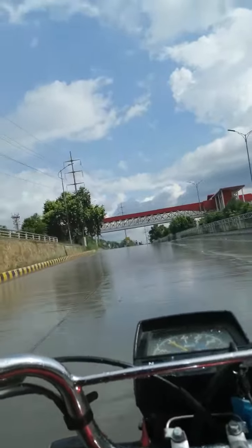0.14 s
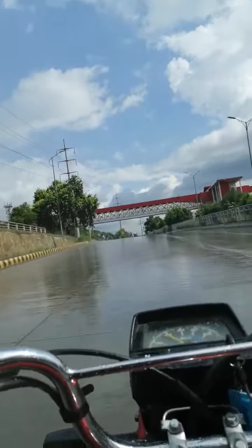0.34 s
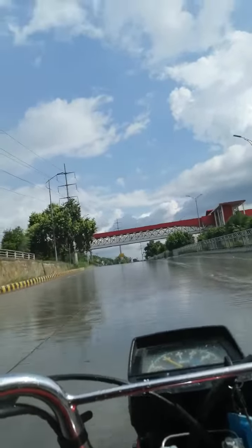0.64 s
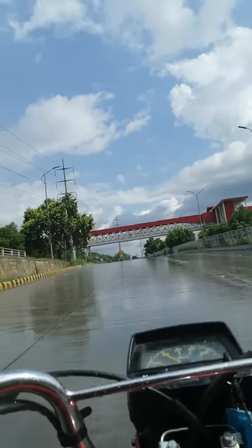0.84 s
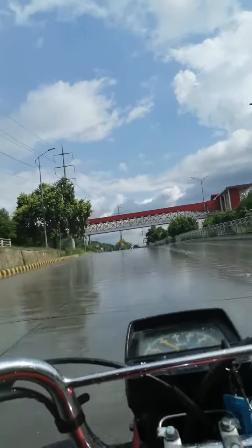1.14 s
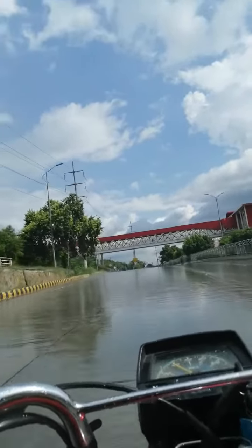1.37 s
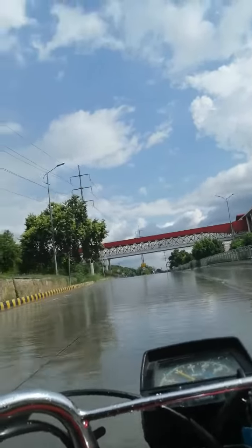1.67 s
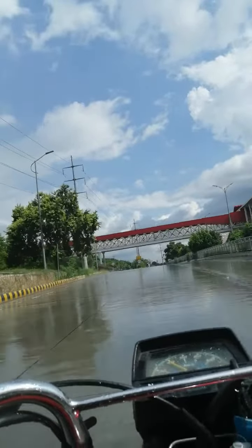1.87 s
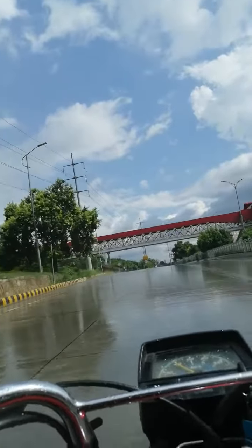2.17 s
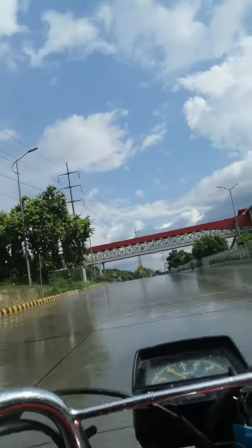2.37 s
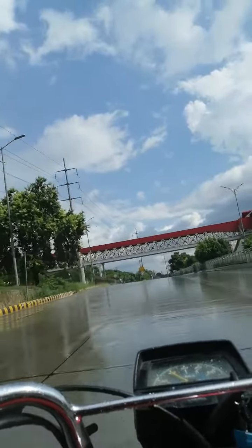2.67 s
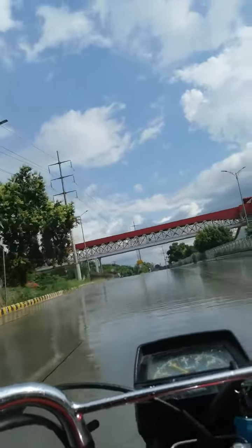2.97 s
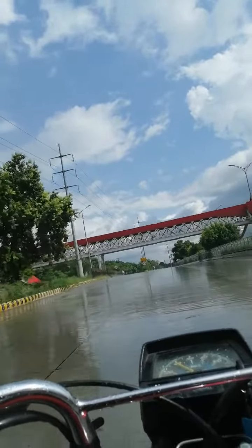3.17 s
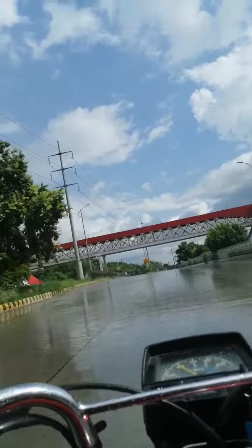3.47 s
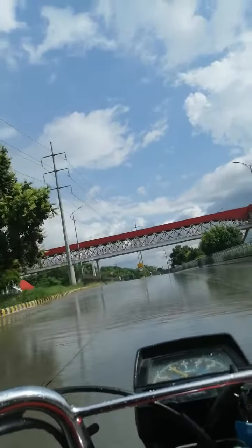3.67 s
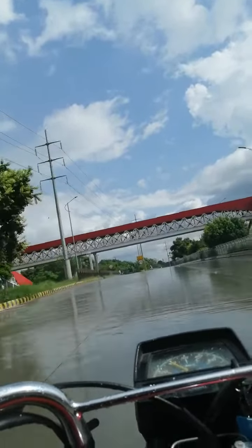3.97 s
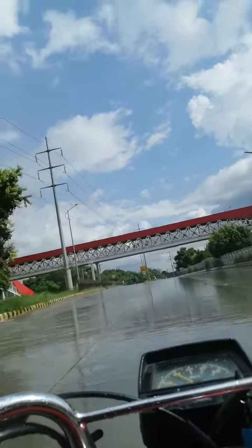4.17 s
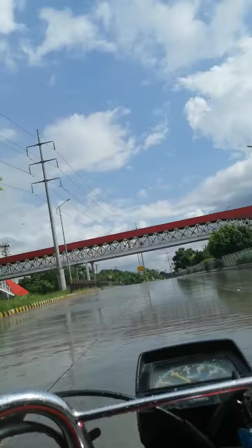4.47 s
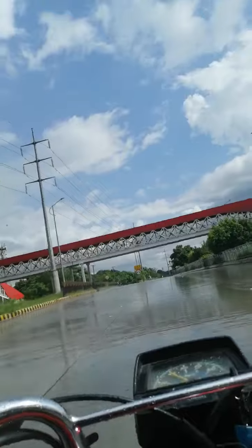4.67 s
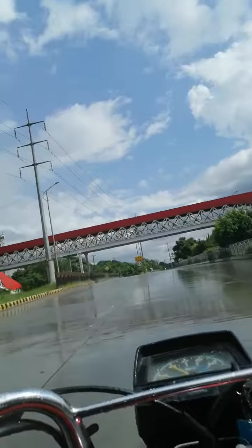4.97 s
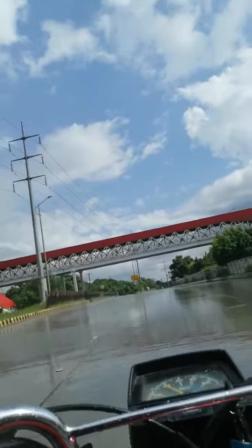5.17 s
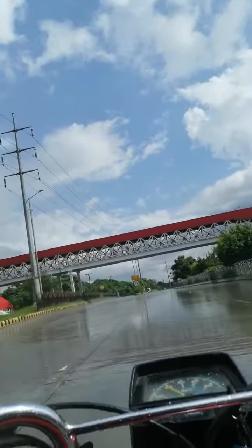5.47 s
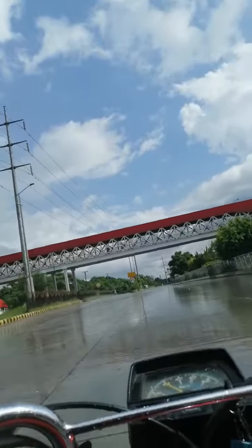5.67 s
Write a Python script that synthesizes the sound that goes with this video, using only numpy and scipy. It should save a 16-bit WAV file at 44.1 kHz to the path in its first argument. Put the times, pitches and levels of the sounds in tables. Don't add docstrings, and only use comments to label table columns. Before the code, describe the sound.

Steady motorbike engine throb with ticking valves over wet tyre hiss, repeatedly buffeted by low, ragged bursts of wind on a phone.

```python
import sys
import numpy as np
from scipy import signal
from scipy.fft import rfft, irfft, next_fast_len
from scipy.io import wavfile
from scipy.ndimage import uniform_filter1d, map_coordinates

SR = 44100
rng = np.random.default_rng(int(sys.argv[2]) if len(sys.argv) > 2 else 0)


def volts(x):
    e = np.asarray(x, float) / 20
    return 10 ** e


def digitize_waveform(pressure):
    field = np.atleast_2d(pressure).T
    bounded = np.clip(field, -1, 1)
    quanta = np.round(bounded * 32767).astype(np.int16)
    wavfile.write(sys.argv[1], SR, quanta)


N = 256662

# t/s, firing rate/Hz
FIRING_RATE = [(0, 31.106), (.582, 31.217), (1.164, 31.304), (1.746, 31.386), (2.328, 31.385),
               (2.91, 31.344), (3.492, 31.458), (4.074, 31.628), (4.656, 31.708), (5.238, 31.997),
               (5.82, 32.229)]
# multiple of the firing rate, level over the hiss/dB
EXHAUST_ORDERS = [(1, -5), (2, 10), (3, -4), (4, 2), (5, 7), (6, -1), (7, -5.5), (8, -6), (9, 1), (10, -2),
                  (11, 1), (12, 5.5), (13, 0), (14, 0), (15, 1), (16, -3.5), (17, -14), (18, -12),
                  (19, -11), (20, -17)]
# multiple of the firing rate, level/dB
SIDE_ORDERS = [(25, -16), (26, -18), (27, -17), (33, -20), (35, -20), (30, -19), (32, -23), (34, -15)]
# share of cycle after firing, level/dB, t60/s
VALVES = [
    (.67, 1, .028),
    (.86, -6, .04),
    (.2, -7, .04),
]
# f/Hz, width/Hz, level/dB
CASING = [(1670, 240, -5.5), (1950, 34, -4.5), (2098, 55, -5.5), (3006, 47, 2.5), (3245, 110, 0),
          (6080, 650, -10)]
# t/s, hiss level/dB
MACHINE_LEVEL = [(0, -48), (1, -46.5), (2, -46.5), (3, -47), (4, -47), (5, -47.5), (5.82, -48)]
# f/Hz, density level/dB
HISS = [(290, -30), (560, -7.5), (900, -1), (1150, -9), (1400, -17), (1700, -7.5), (2250, -12.5),
        (3100, -11), (3500, -19.5), (4300, -20.5), (5200, -8), (6100, -10.5), (6900, -22), (7300, -21.5)]
# t/s, strength level/dB
AIRFLOW = [(0, -39), (.21, -33.5), (.3, -37), (.41, -39.5), (.52, -35.5), (.63, -34.5), (1.03, -35),
           (1.08, -45), (1.2, -39), (1.78, -40.5), (2.03, -35), (2.85, -34.5), (3.1, -27), (3.66, -34),
           (4.1, -29.5), (4.45, -39.5), (4.62, -29), (5.82, -35)]
# t/s, strength level/dB, deep over flutter/dB, half-length/s
GUSTS = [(0, -25, 3, 0.032), (0.1, -30, -3, 0.037), (0.326, -31, -2, 0.026), (0.488, -33, -4, 0.027),
         (0.559, -29.5, 1, 0.0302), (1.26, -27, 6, 0.025), (1.29, -38, -8, 0.034), (1.407, -28, 6.5, 0.043),
         (1.498, -26, 3.5, 0.028), (1.599, -31, 2, 0.066), (1.716, -28, -2, 0.027),
         (2.224, -36.5, -13.5, 0.067), (2.599, -34.5, -5, 0.052), (3.133, -29.5, 7.5, 0.066),
         (3.29, -25, 5, 0.049), (3.413, -29.5, -3, 0.065), (3.572, -25, 4, 0.08), (3.782, -35, 15, 0.06),
         (3.86, -29, 4.5, 0.046), (4.126, -27.5, 14.5, 0.023), (4.243, -24, 7.5, 0.089),
         (4.419, -25.5, -15.5, 0.011), (4.65, -35, -5, 0.034), (5.127, -26.5, 10.5, 0.013),
         (5.219, -26, 3.5, 0.049), (5.365, -35.5, 14.5, 0.023), (5.428, -28, -16, 0.014),
         (5.54, -22.5, 1, 0.024), (5.656, -25, 3.5, 0.068), (5.804, -27.5, -2.5, 0.046)]
# f/Hz, density level/dB
DEEP = [(12, -18), (25, 0), (70, 1.5), (130, -10), (250, -31), (500, -54)]
# f/Hz, density level/dB
FLUTTER = [(50, -25.5), (110, 3), (180, -1), (330, -4), (600, -15.5), (1100, -39.5), (1600, -70.5)]
# f/Hz, density level/dB
SLAP = [(200, -7.5), (450, 0), (650, -1), (1000, -11), (1400, -33.5), (1900, -42), (3000, -86.5)]
# f/Hz, density level/dB
EDGE = [(300, -38.5), (700, 0), (1000, 5), (1400, -3), (1800, -22), (2800, -66)]
# strongest t/s, peak level/dB, f/Hz, pulses
EDDIES = [(.0085, -19, 340, 2), (.1169, -12.5, 280, 1), (.1502, -15, 430, 1), (.1567, -15, 500, 1),
          (.1728, -14.5, 230, 2), (.2093, -15, 580, 1), (.3278, -14.5, 240, 1), (.572, -23.5, 300, 1),
          (1.233, -18, 90, 1), (1.299, -19, 240, 1), (1.5092, -18.5, 400, 3), (1.5823, -18.5, 270, 1),
          (2.1996, -18, 240, 1), (2.4881, -20, 200, 1), (2.5503, -15.5, 340, 1), (2.98, -14, 430, 2),
          (3.2875, -15.5, 260, 1), (3.2925, -17, 300, 1), (3.2965, -16, 260, 1), (3.8452, -15, 270, 2),
          (3.8867, -18, 370, 2), (4.136, -17, 200, 2), (4.1827, -15.5, 200, 1), (4.2434, -17.5, 560, 1),
          (4.2651, -15, 280, 3), (4.2926, -16.5, 670, 1), (4.3184, -15, 240, 1), (4.4218, -16, 430, 2),
          (4.6062, -14, 580, 1), (5.4334, -17, 270, 4), (5.6577, -15.5, 230, 2), (5.7786, -13, 370, 5),
          (.123, -20, 300, 1), (.1635, -17, 450, 1), (.4595, -27, 740, 3), (1.476, -26, 620, 1),
          (2.548, -19, 380, 1), (3.0435, -23, 650, 1), (3.568, -21, 620, 1), (3.6185, -22, 750, 1),
          (4.2615, -15, 700, 1), (4.41, -21, 800, 1), (5.1135, -26, 650, 1), (5.41, -23, 620, 2),
          (5.5825, -20, 850, 1), (5.607, -26, 620, 1), (5.425, -18, 280, 1), (3.845, -20, 450, 1)]
# t/s, peak level/dB, f/Hz
THUMPS = [(.4931, -20.5, 330), (.558, -21, 150), (1.412, -20, 90), (1.487, -22, 130), (1.592, -22, 110),
          (1.637, -21, 330), (1.724, -21, 120), (3.042, -20, 400), (3.0857, -19, 180), (3.1263, -21, 180),
          (3.149, -19, 200), (3.1756, -20, 130), (3.2183, -18, 200), (3.3988, -20, 150), (3.5013, -20, 130),
          (3.5491, -21, 150), (3.5772, -18.5, 240), (3.6125, -19, 130), (3.741, -21, 150),
          (3.798, -21, 150), (4.2345, -17, 150), (4.6348, -18, 180), (4.8462, -20, 200), (5.1996, -18, 150),
          (5.2477, -16.5, 150), (5.5216, -18, 270), (5.5499, -17.5, 240), (5.6169, -20, 130),
          (5.6292, -19, 240), (5.8129, -17.5, 400), (.1063, -17.5, 300), (.214, -23, 150),
          (1.318, -22, 350), (1.5035, -17, 400), (1.766, -22, 380), (2.596, -21, 350), (3.0976, -19, 300),
          (3.2649, -18, 300), (3.3169, -18, 200), (3.461, -22, 350), (3.495, -21, 140), (3.769, -21, 140),
          (4.1695, -19, 200), (4.1946, -19, 250), (4.2245, -19, 500), (4.272, -15, 170), (4.3255, -18, 450),
          (4.978, -21, 140), (5.082, -21, 140), (5.1162, -19, 160), (5.482, -21, 380), (5.708, -20, 140),
          (5.75, -19, 350), (5.7845, -16, 300)]
PULLS = [.123, 2.488, 2.5475, 3.2925, 3.126, 3.317, 3.577, 3.613, 3.8, 4.243, 4.265, 4.293, 4.318, 4.41,
         4.606, 4.634, 5.116, 5.2, 5.425, 5.433, 5.617, 5.779]
# t/s, peak level/dB, f/Hz, cycles
DROPS = [(.0566, -34, 3000, 2), (.3878, -28, 3500, 1), (.8261, -30, 5400, 2), (.977, -32, 5600, 2),
         (1.0418, -20, 5700, 4), (1.0693, -27, 4600, .8), (1.1495, -28, 3800, 1), (1.171, -26, 3000, 1),
         (1.2017, -33, 2800, 1), (1.3578, -30, 5600, 2), (2.0198, -28, 5100, 2), (2.7441, -32, 3000, 1),
         (4.5537, -33, 3100, 3), (5.4004, -36, 3600, 1), (5.4934, -29, 5200, 1), (.307, -33, 5800, 1),
         (.464, -35, 6200, 1), (.508, -35, 6200, 1), (.795, -33, 5600, 1), (1.404, -35, 3200, 2),
         (2.04, -34, 3050, 2), (2.266, -34, 5300, 2), (2.4247, -34, 3250, 3), (4.378, -36, 4000, .8),
         (5.1136, -32, 5900, 2)]
# t/s, peak level/dB, cracking edge level/dB, length/s
PUFFS = [(0.102, -27, -38, 0.0061), (0.146, -14.5, -39, 0.02), (0.207, -21, -44, 0.0072),
         (0.32, -24, -46, 0.0052), (0.449, -25, -36, 0.0077), (1.5, -24, -43, 0.0083),
         (1.584, -18, -33, 0.0052), (1.256, -27.5, -50, 0.018), (2.977, -30, -47, 0.013),
         (3.035, -23.5, -47, .007), (3.082, -23, -41, 0.02), (3.278, -23, -44, 0.0097),
         (3.57, -21, -35, 0.034), (3.615, -24.5, -36, 0.0046), (4.242, -19, -39, 0.009),
         (4.255, -9.5, -33, 0.0088), (4.287, -16, -31, 0.0055), (4.322, -18, -32, 0.004),
         (4.392, -18, -33, 0.0055), (4.411, -39, -33, 0.0093), (4.6, -19, -23, 0.0054),
         (4.632, -22, -44, 0.0087), (4.722, -20, -39, .008), (5.107, -27.5, -40, .007),
         (5.216, -30, -28.5, 0.014), (5.24, -37, -29, 0.0057), (5.406, -22, -44, 0.021),
         (5.436, -25.5, -32.5, 0.014), (5.579, -22, -32.5, 0.0084), (5.778, -27, -42, 0.0076),
         (0.46, -23.5, -42, .006), (0.551, -29, -44, 0.0048), (1.224, -25.5, -47, .006),
         (1.298, -30, -40, 0.0048), (1.469, -37, -44, 0.0045), (1.635, -26, -43, 0.007),
         (1.954, -27.5, -37, .006), (2.285, -26.5, -44, 0.0071), (2.886, -28, -44, 0.0065),
         (3.095, -30, -29, .006), (3.298, -31, -42, 0.0053), (3.433, -29, -33.5, 0.0048),
         (3.951, -26, -42, 0.0076), (4.194, -23, -40, 0.0086), (4.223, -24, -37, .009),
         (4.841, -23, -45, 0.0073), (5.486, -28, -40, .007), (5.537, -28, -29, .005),
         (5.605, -27, -39, .006), (4.292, -28, -30.5, 0.0074)]


def unit(x):
    return x / np.sqrt(np.mean(x ** 2) + 1e-20)


def along(points, hz):
    f, v = np.transpose(points)
    return np.interp(np.log(hz + 1), np.log(f + 1), v)


def curves(rows):
    s, *cols = np.transpose(rows)
    return [np.interp(np.arange(N) / SR, s, c) for c in cols]


def wobble(rate):
    knots = rng.standard_normal(int(N * rate / SR) + 4)
    return map_coordinates(knots, [np.arange(N) * rate / SR])


def filtered(x, response):
    m = next_fast_len(N + SR // 2)
    return irfft(rfft(x, m) * response(np.fft.rfftfreq(m, 1 / SR)), m)[:N]


def shaped(x, points):
    return filtered(x, lambda hz: volts(along(points, hz)))


def causal(points):
    def response(hz):
        cepstrum = irfft(np.log(volts(along(points, hz)) + 1e-6))
        cepstrum[1:len(hz) - 1] *= 2
        cepstrum[len(hz):] = 0
        return np.exp(rfft(cepstrum, 2 * len(hz) - 2))
    return response


def modes(rows):
    def response(f):
        total = 0
        for k, (centre, width, db) in enumerate(rows):
            damping = 1j * f * width
            total = total + (-1) ** k * volts(db) * damping / (centre ** 2 - f * f + damping)
        return total
    return response


def noise(spectrum):
    return unit(shaped(rng.standard_normal(N), spectrum))


def steady(spectrum, span):
    x = noise(spectrum)
    return x / np.sqrt(np.abs(uniform_filter1d(x * x, int(span * SR))) + 0.046)


def later(pulses, share, rate):
    return np.roll(pulses, round(share * SR / rate.mean()))


def engine():
    rate = curves(FIRING_RATE)[0]
    cycle = np.cumsum(rate) / SR + .849
    combustion = cycle + .002 * wobble(20)
    fired = np.flatnonzero(np.diff(np.floor(combustion)) > 0)
    pulses = np.zeros(N)
    pulses[fired] = volts(1.5 * rng.standard_normal(len(fired)))
    exhaust = thrum(combustion) + bark(pulses, rate) + roar()
    return exhaust + gears(cycle, rate) + piston(pulses, rate) + panel(pulses) + valves(cycle, rate)


def thrum(combustion):
    dips = np.array([.31, .72])
    out = np.zeros(N)
    for k, db in EXHAUST_ORDERS[:10]:
        lag = np.angle(-np.exp(-2j * np.pi * k * dips) @ [.75, 1])
        out += volts(db + 3 + 1.2 * wobble(6)) * np.cos(2 * np.pi * k * combustion + lag)
    return out


def bark(pulses, rate):
    orders = [(k * 31.4, db) for k, db in EXHAUST_ORDERS[10:]]
    pipe = [(315, -60)] + orders + [(700, -26), (1000, -28), (1400, -45), (3000, -80)]
    echoed = pulses + volts(-10) * later(pulses, .28, rate)
    return volts(8.6) * unit(shaped(echoed, pipe))


def roar():
    return volts(-3.3) * noise([(150, -31.5), (260, -6.5), (480, 2), (560, -18.5), (900, -15.5), (1200, -34.5)])


def gears(cycle, rate):
    fade_29 = np.interp(rate, [31.4, 31.7], [1, .35])
    rise_28 = np.interp(rate, [31.7, 31.9], [.14, .55])
    out = np.sin(2 * np.pi * 29 * cycle) * volts(1.5 * wobble(8) - 4.5) * fade_29
    out += np.sin(2 * np.pi * 28 * cycle) * rise_28
    for k, db in SIDE_ORDERS:
        out += volts(db + 2 * wobble(5)) * np.sin(2 * np.pi * k * cycle + k)
    return out


def piston(pulses, rate):
    strokes = sum(later(pulses, share, rate) for share in (.12, .62))
    bore = modes([(870, 240, 0)])
    return volts(-11.5) * unit(filtered(strokes, lambda f: bore(f) ** 2))


def panel(pulses):
    shaking = pulses + 0.023 * rng.standard_normal(N)
    return volts(-13.0) * unit(filtered(shaking, modes([(901.0, 15.0, 0)])))


def valves(cycle, rate):
    knocks = np.zeros(N)
    for share, db, t60 in VALVES:
        since_knock = ((cycle - share) % 1) / rate
        knocks += volts(db - 60 * since_knock / t60)
    rough = knocks * volts(1.2 * wobble(40)) * rng.standard_normal(N)
    return volts(-5.5) * unit(filtered(rough, modes(CASING)))


def spray():
    z = signal.stft(rng.standard_normal(N), nperseg=512)[2]
    patches = uniform_filter1d(rng.standard_normal(z.shape), 6, 0)
    patches = unit(uniform_filter1d(patches, 10, 1))
    sheet = unit(signal.istft(z * volts(0.87 * patches), nperseg=512)[1][:N])
    droplets = (rng.random(N) < 90 / SR) * rng.uniform(-1.32, 1, N)
    crackle = shaped(droplets, [(1500, -31.5), (3500, 4.5), (8000, 4.0)])
    return unit(filtered(sheet + 9 * crackle, causal(HISS)))


def airflow():
    t = np.arange(0, N / SR + .002, .001)
    gusts = 0
    for s, db, deep_db, half in GUSTS:
        powers = volts([[2 * db + deep_db], [2 * db - deep_db]])
        gusts = gusts + powers * np.exp(-2 * ((t - s) / half) ** 2)
    return np.sqrt(volts(2 * curves(AIRFLOW)[0]) + curves(np.vstack([t, gusts]).T))


def wind():
    large, small = airflow()
    lump = wobble(35)
    deep_lumps = volts(0.98 * lump)
    deep = large * volts(-4.5) * unit(deep_lumps * steady(DEEP, span=0.087))
    flutter_lumps = volts(1.6 * lump + 2.16 * wobble(120))
    flutter = small * volts(-3.5) * unit(flutter_lumps * steady(FLUTTER, span=0.047))
    rasp_lumps = volts(3.2 * lump + 2.2 * wobble(120))
    rasp_strength = np.hypot(small * volts(-11.5), wakes())
    rasp = rasp_strength * volts(-4) * unit(rasp_lumps * steady(SLAP, span=0.022))
    return deep + flutter + rasp + eddies(small) + puffs()


def eddies(flow):
    rows = []
    for s, db, hz, pulses in EDDIES:
        for k in range(pulses):
            place = (k + 1) // 2 * (-1) ** k
            duller = 0.66 if k else 1
            rows.append((s + 0.00718 * place, volts(db - 5.5 * np.sqrt(k)), hz * duller))
    rows += [(s, volts(db), hz) for s, db, hz in THUMPS]
    sides = [-1 if np.abs(s - np.array(PULLS)).min() < .0015 else 1 for s, *_ in rows]

    when, size, pitch = rng.random((3, round(20 * N / SR)))
    stray_gain = flow[(when * N).astype(int)] * volts(2 + 14 * (size - .5))
    stray_hz = 192 * 2 ** (1.3 * (pitch - .5))
    rows += zip(when * N / SR, stray_gain, stray_hz)
    sides += list(rng.choice([-1, 1], len(when)))

    out, t = np.zeros(N + SR), np.arange(-SR // 50, SR // 50) / SR
    for (s, gain, hz), side in zip(rows, sides):
        u = (np.pi * hz * t) ** 2
        swing = (1 - 1.55 * u) * np.exp(-u)
        out[round(s * SR):][:len(t)] += side * gain * swing
    return out[SR // 50:][:N]


def drops():
    out, t = np.zeros(N + SR), np.arange(SR // 100) / SR
    for s, db, hz, cycles in DROPS:
        ring = np.sin(2 * np.pi * hz * t) * np.exp(-(t * hz / cycles) ** 2)
        out[round((s - .0001) * SR):][:len(t)] += volts(db) * ring
    return out[:N]


def puffs():
    out = np.zeros(N)
    slap, edge = steady(SLAP, span=0.0044), steady(EDGE, span=0.0063)
    for s, db, crack_db, length in PUFFS:
        add_puff(out, slap, s, db - 3.0, length, rise=0.0029)
        add_puff(out, edge, s, crack_db - 2.0, 0.68 * length, rise=0.0012)
    return out


def add_puff(out, source, s, peak_db, length, rise):
    start = round(s * SR)
    t = np.arange(min(SR // 8, N - start)) / SR
    envelope = (t / rise).clip(0, 1) * np.exp(-(t / length) ** 2)
    puff = envelope * source[start:start + len(t)]
    out[start:start + len(t)] += volts(peak_db) * puff / np.abs(puff).max()


def wakes():
    t, power = np.arange(SR // 3) / SR, np.zeros(N + SR)
    decay_s = .03
    for s, db, *_ in PUFFS:
        wake_db = -33.5 + (db + 16.5)
        power[round(s * SR):][:len(t)] += volts(2 * wake_db) * np.exp(-2 * t / decay_s)
    return np.sqrt(power[:N])


def duck(x):
    threshold_db, share, release_db_per_s, ease_s = -22, 0.39, 23.5, 0.015
    over_db = share * np.clip(20 * np.log10(np.abs(x) + 1e-9) - threshold_db, 0, None)
    climb_db = release_db_per_s * np.arange(N) / SR
    held_db = np.maximum.accumulate(over_db + climb_db) - climb_db
    span = int(ease_s * SR) | 1
    return volts(-uniform_filter1d(held_db, span, origin=span // 2))


def scene():
    machine = volts(curves(MACHINE_LEVEL)[0]) * (engine() + volts(2.5) * spray())
    air, ticks = wind(), drops()
    gain = duck(air + volts(6) * ticks)
    return (gain * machine + ticks + air)[None]


def roll_off(x):
    return signal.sosfilt(signal.butter(12, 7910, fs=SR, output="sos"), x)


def record(dry):
    top = .27
    limited = dry[0] / (1 + np.abs(dry[0] / top) ** 6) ** (1 / 6)
    mix = shaped(limited, [(7250, -0.5), (7450, -10.5), (7650, -21.5), (7850, -37.5), (8100, -100)])
    return roll_off(mix[None])


dry = scene()
out = record(dry)
digitize_waveform(out)
```